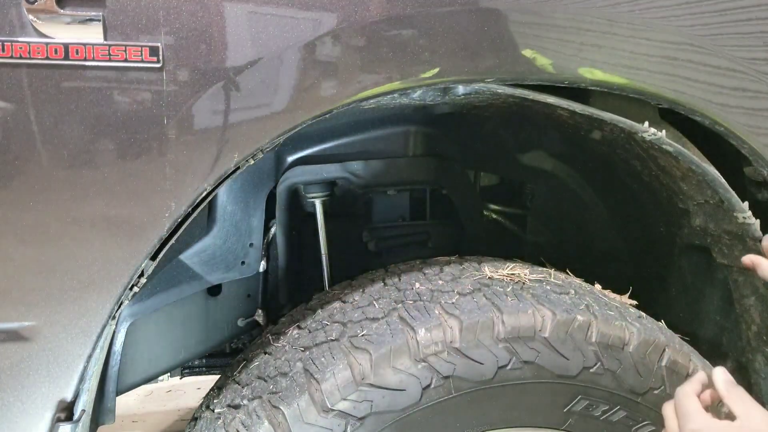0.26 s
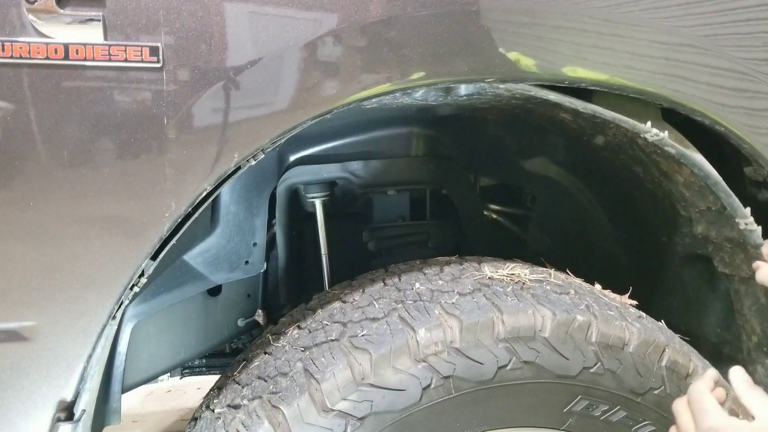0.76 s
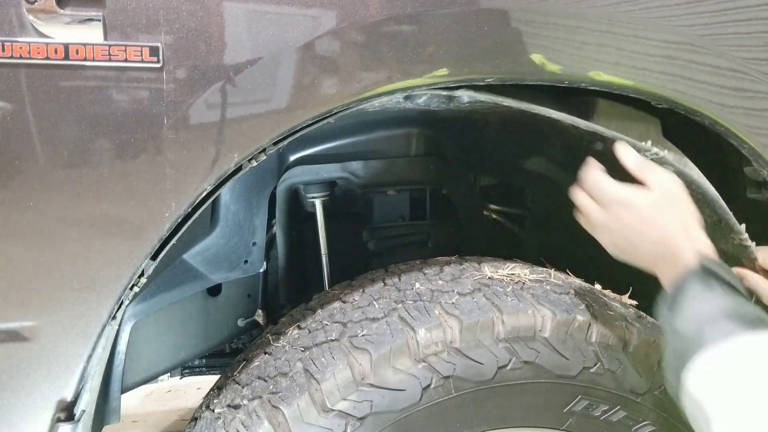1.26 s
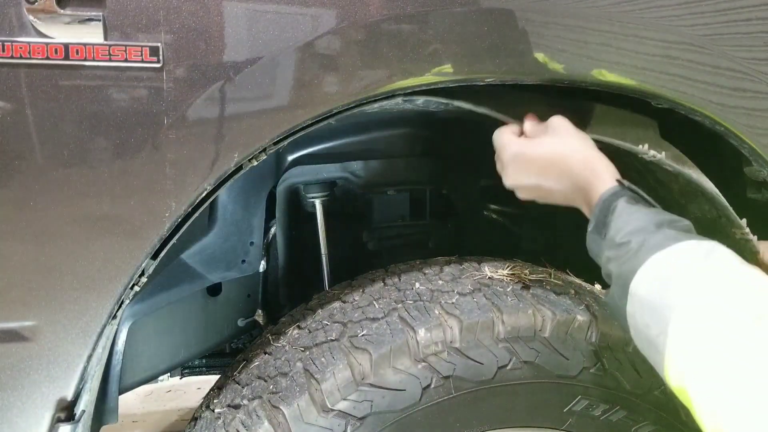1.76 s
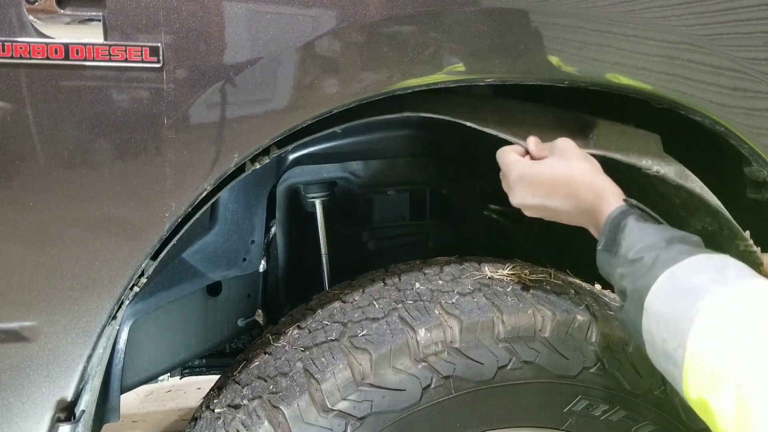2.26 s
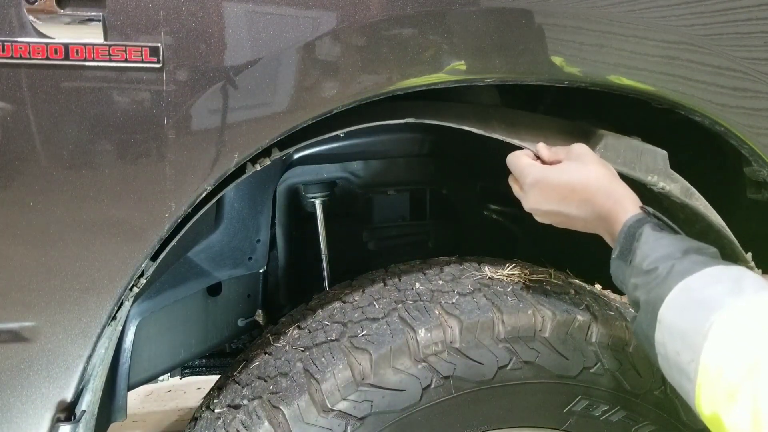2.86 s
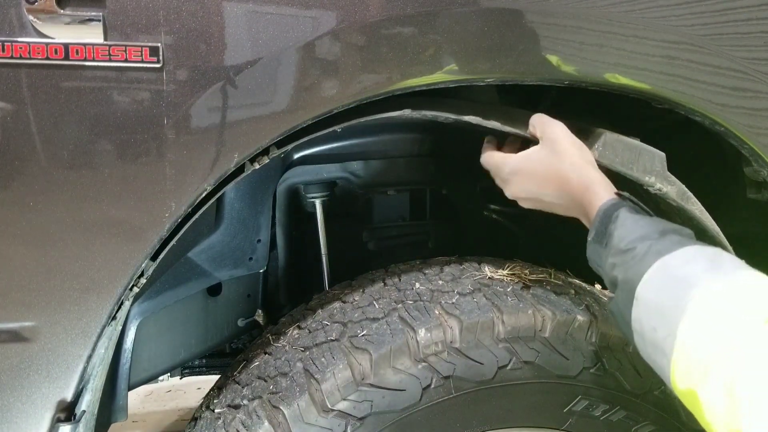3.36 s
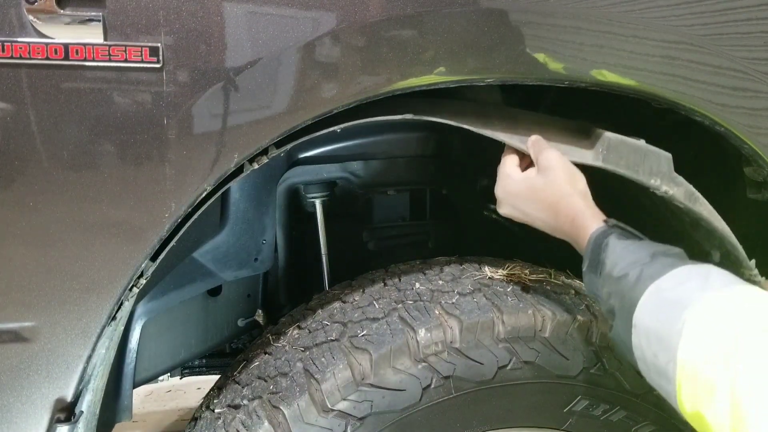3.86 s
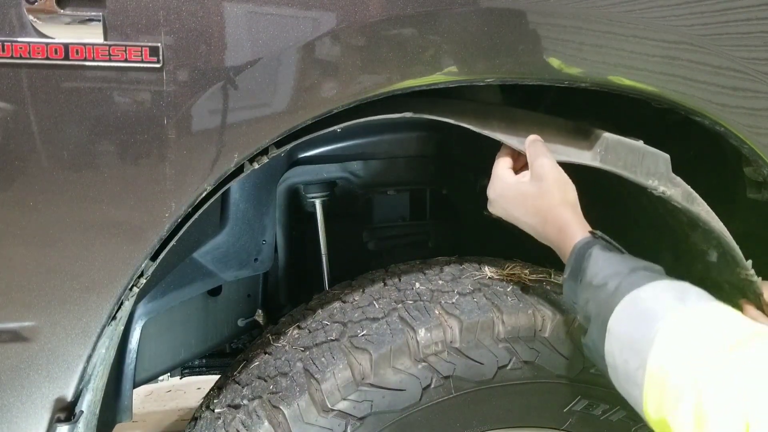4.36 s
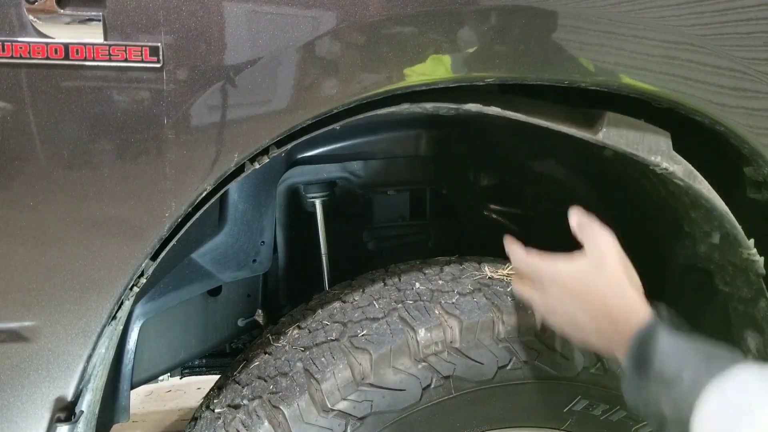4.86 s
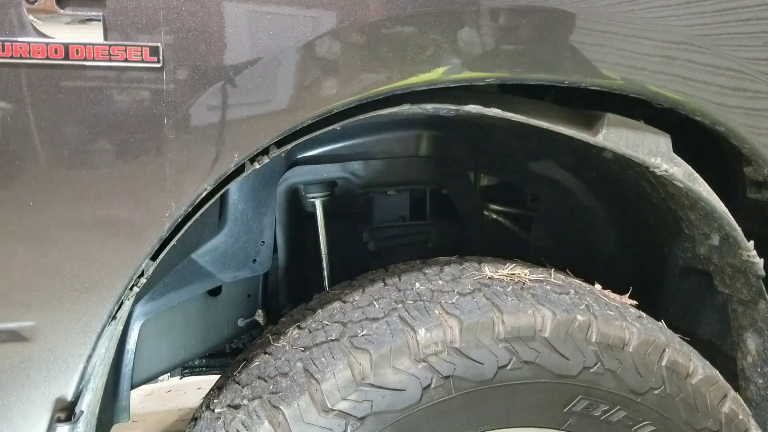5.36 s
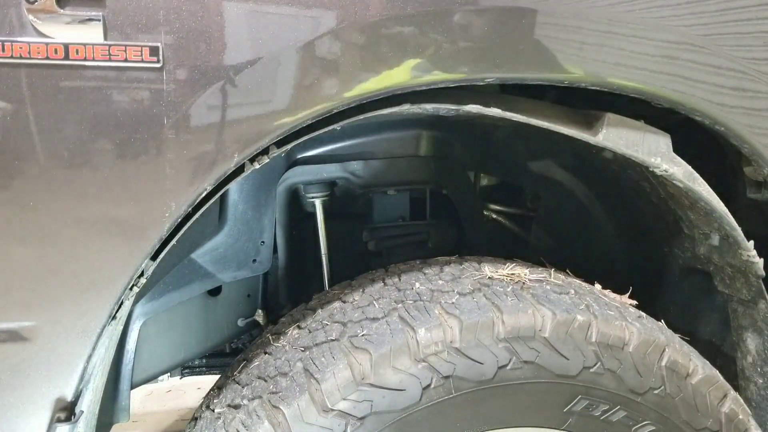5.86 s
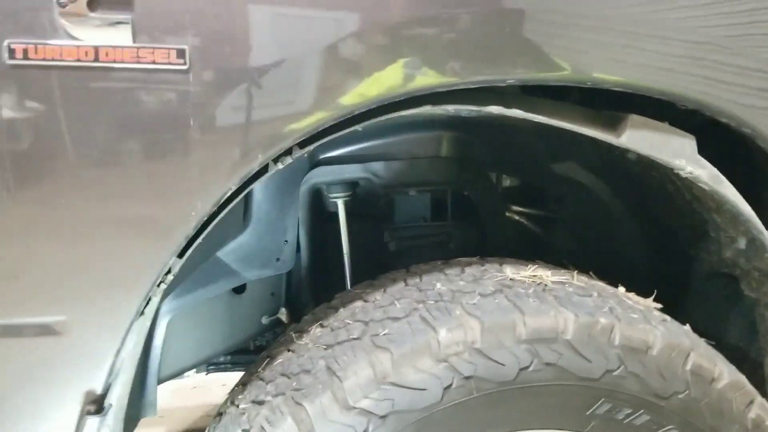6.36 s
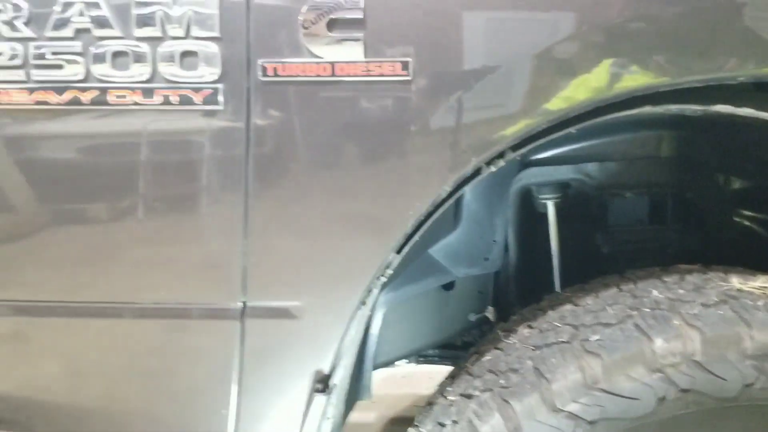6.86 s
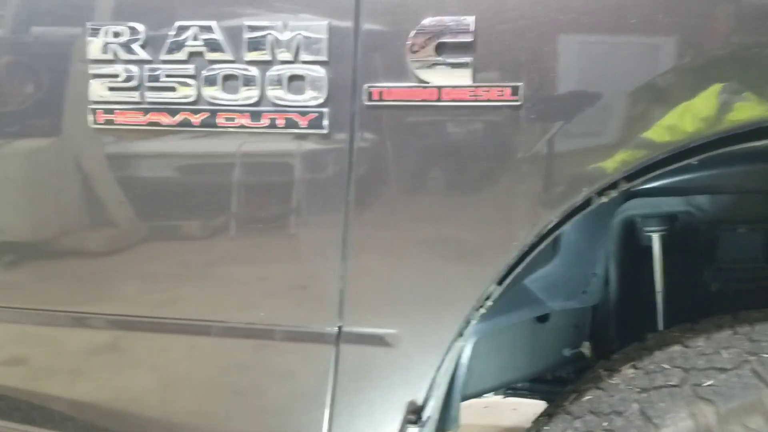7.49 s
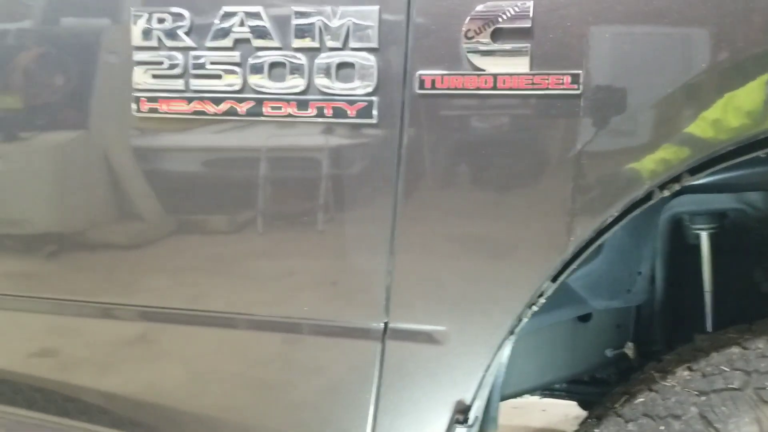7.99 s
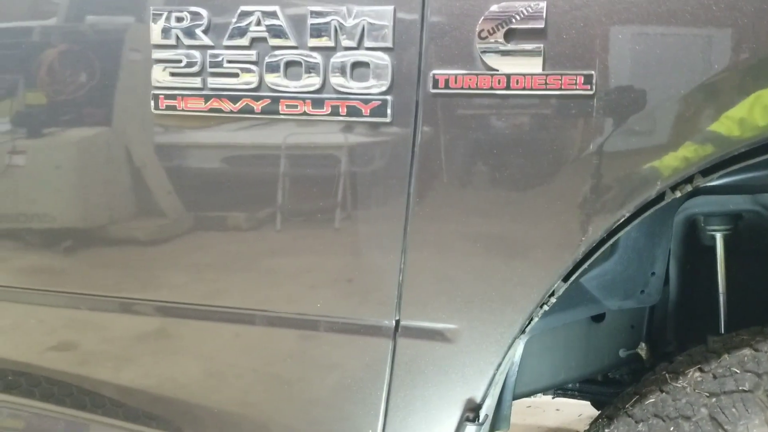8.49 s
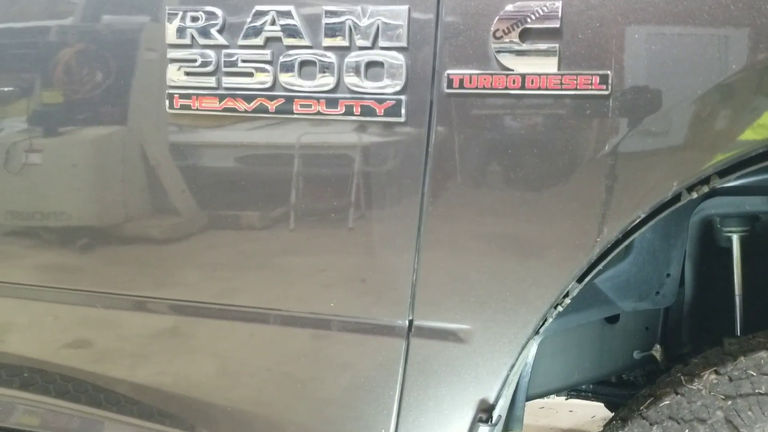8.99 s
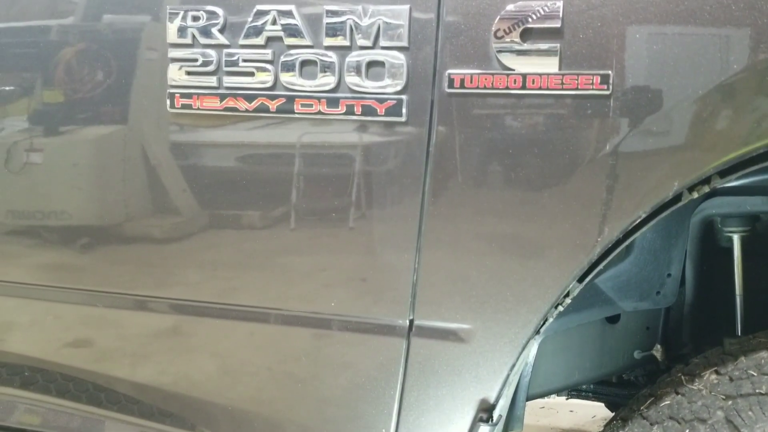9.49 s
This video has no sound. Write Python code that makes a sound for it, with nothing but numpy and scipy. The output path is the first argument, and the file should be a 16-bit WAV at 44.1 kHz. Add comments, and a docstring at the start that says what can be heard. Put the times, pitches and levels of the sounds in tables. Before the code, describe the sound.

A close, handheld stereo phone pickup in a workshop with short echo, low air rumble and barely audible machine hum. After near quiet, a tiny metal clink and jacket rustle at 0.3 s lead to a tight flurry of hollow plastic knocks from 0.4 to 1.1 s, strongest around 0.8, with dry scraping and juddering. Softer double knocks come at 1.7 and 2.0, then light bumps and ticks until 3.2. A short creak at 3.5 runs into a hard, bright clack at 3.57; smaller knocks, straining and faint squeaks continue to 4.9. Cloth swishes at 5.1; sharp case clicks and finger crackle come at 5.6. Dull steps with gritty crunch follow from 6.1 to 8.0, firmest around 7.15 with a faint metal ring. After a lull, rustling, steps and dull scuffs return from 8.8, with a sharp tick near 9.4.

```python
"""Wheel-well liner pulled about by hand

A plastic wheel-well liner knocks against the wing as rings of the sheet, a denser clack and a crack of noise.
It judders, creaks and scrapes in stick-and-slip grains amid dull mid-range bursts; a work jacket swishes finely.
Fingers crackle on a phone's case, and steps thud, tap and crunch on a gritty floor among small metal clinks.
A short hall echo of decaying noise follows the blows and steps; air rumble and a faint machine hum lie below."""
import sys
import numpy as np
from scipy import signal
from scipy.fft import rfft, irfft
from scipy.io import wavfile
from scipy.ndimage import uniform_filter1d

SR = 44100
rng = np.random.default_rng(int(sys.argv[2]) if len(sys.argv) > 2 else 0)


def materialize(psi):
    """Save the field psi as 16-bit PCM at rate SR to the path in sys.argv[1].

    A 1-D psi becomes a single channel; in a 2-D psi each row is a channel.
    """
    bounded = np.clip(np.atleast_2d(psi).T, -1, 1)
    quanta = np.round(bounded * 32767).astype(np.int16)
    wavfile.write(sys.argv[1], SR, quanta)


N = 429093
TIME = np.arange(N) / SR  # seconds
RING = TIME[:SR // 2]  # half a second, the span of every single blow
TOP_HZ = 16000  # nothing is heard above this
STROKE_DB = 20  # a sliding movement's rise and fall times span this many dB if its roundness is 1
SKEW_HZ = 219  # well below this the left port runs ahead of the right in phase
# a dull noise burst rises quickly, sags slightly, then falls
BURST_RISE_DB_PER_S, BURST_SAG_DB_PER_S, BURST_FALL_DB_PER_S = 398, 32, 156.5

# All levels in the tables are relative: each layer trims its own.
# Blows of the liner. Each row: start in seconds, boom of the sheet in dB, clack in dB, crack in dB,
# share of the free ring time left by the hand from 0 to 1.
LINER_KNOCKS = [(0.432, -30.5, -19.5, -46, 0.05), (0.451, -21.5, -47, -59, 0.12),
                (0.706, -33.5, -44.5, -65, 0.08), (0.763, -20, -24, -38.5, .22),
                (0.803, -15, -33.5, -31.5, 0.28), (0.853, -41, -50, -35.5, 0.3),
                (0.897, -20, -23, -39, 0.3), (0.928, -22, -46, -39, 0.27), (0.956, -23.5, -54, -44, 0.26),
                (1.034, -30.5, -38, -46, 0.9), (1.121, -45, -50, -41, 0.4), (1.279, -54, -44, -43.5, 0),
                (1.668, -26.5, -37.5, -40, 0.18), (1.691, -26.5, -31, -44.5, 0.43),
                (1.889, -35, -36.5, -83, 0.23), (1.974, -24.5, -44.5, -52, .16),
                (1.995, -30.5, -44, -44, 0.4), (2.101, -39, -44.5, -74, 0.28),
                (2.231, -60, -45, -57.5, 0.25), (2.313, -45.5, -51.5, -75, .25),
                (2.357, -48.5, -43, -48, 0.6), (2.568, -44, -39, -46, 0.2), (2.661, -54, -43, -65, .3),
                (2.679, -37.5, -55, -64, 0.17), (2.693, -48, -42, -50.5, .47), (2.804, -43, -43, -44, 0.55),
                (3.149, -39, -37.5, -44.5, 0.01), (3.35, -43.5, -55, -49, 0.62), (3.5552, -29, -21, -40, 0),
                (3.5655, -16.5, -17, -18, 0.48), (3.57, -27, -12, -30, 0.03),
                (3.691, -30.5, -38, -47, 0.35), (3.849, -42, -43.5, -40.5, 0.2), (3.875, -36, -47, -35, .6),
                (3.917, -33.5, -48, -36.5, .33), (3.963, -57.5, -33.5, -41.5, 0.1),
                (4.207, -33, -46, -40, 0.54), (4.237, -33, -53, -67, 0.16),
                (4.332, -44.5, -43.5, -56, 0.47), (4.662, -41.5, -39, -42.5, 0.8),
                (4.689, -39, -38.5, -45, 0.08), (4.797, -67, -30, -36.5, 0.16),
                (4.868, -63, -32, -40.5, 0.09)]
# Modes of the plastic sheet. Each row: frequency in Hz, level in dB, free decay t60 in seconds.
LINER_MODES = [(115.5, -19.5, 0.93), (218.4, -17.5, 0.23), (307, -3.5, 0.17), (439.6, 6, 0.12),
               (450.8, -6, 0.44), (490, -28.5, 0.5), (646, -27.5, 0.17), (770, -30, 0.88),
               (861, -6.5, 0.096), (904, 1, 0.088), (950, -25, 0.59), (1020, -15.5, 0.95),
               (1140, -24.5, 0.38), (1520, -26.5, 0.51)]
# Straining of the bent sheet. Each row: strongest moment in seconds, level in dB, rise and fall in seconds.
LINER_JUDDERS = [(0.47, -34.5, 0.12, .3), (1.01, -37.5, 0.15, .29), (2.05, -52.5, 0.63, 0.12),
                 (2.38, -46.5, 0.23, 0.16), (2.82, -56, 0.68, 0.9), (3.62, -38.5, 0.087, .3),
                 (3.91, -46, 0.28, .23), (4.28, -43, .15, 0.53), (4.72, -49.5, 0.62, 0.39)]
# Plastic creaks against the wing. Each row: start in seconds, length in seconds, pitch in Hz, level in dB.
LINER_CREAKS = [(3.474, 0.092, 760, -47.5), (4.396, 0.055, 1870, -48), (4.454, 0.045, 1930, -65)]
# Bursts of dull mid-range noise, 350 to 1300 Hz. Each row: start in seconds, length in seconds, level in dB.
DULL_NOISE_BURSTS = [(0.305, .04, -45), (0.44, .07, -41.5), (0.77, 0.071, -31.5), (0.9, .05, -34.5),
                     (1.29, .11, -41), (1.675, .045, -41), (1.98, .075, -38.5), (2.365, .075, -44.5),
                     (2.575, .025, -51.5), (2.8, .13, -44), (3.15, .14, -43.5), (3.57, .06, -35.5),
                     (3.87, .12, -41), (4.58, .2, -47), (4.8, .085, -37.5), (5.23, .13, -48),
                     (5.47, 0.094, -49), (5.564, 0.12, -41), (5.75, .16, -51.5), (5.93, .12, -49.5),
                     (6.1, .19, -54), (8.775, .06, -47.5), (9.26, .12, -40), (9.362, .13, -38.5),
                     (9.523, .21, -47.5)]
# Dry scrapes. Each row: fastest moment in seconds, level in dB, rise and fall in seconds.
DRY_SCRAPES = [(0.535, -34.5, 0.031, .18), (0.62, -37, 0.19, 0.16), (3.91, -50.5, .08, .05),
               (9.37, -46.5, 0.15, 0.43)]
# Movements that swish the jacket. Each row: fastest moment in seconds, level in dB, rise and fall in seconds.
JACKET_SWISHES = [(0.32, -39.5, 0.035, 0.093), (0.54, -36.5, 0.16, 0.19), (0.8, -51.5, .1, 0.16),
                  (1.2, -44, 0.42, 0.35), (1.7, -57.5, 0.22, .25), (2.01, -54, 0.17, 0.12),
                  (2.53, -50, .19, 0.22), (2.83, -61, 0.12, 0.16), (3.12, -61, 0.27, 0.61),
                  (3.37, -51, 0.062, 0.057), (3.59, -54.5, 0.11, .4), (4.31, -55.5, 0.27, 0.37),
                  (4.72, -46.5, 0.33, 1), (5.14, -40, 0.4, 0.41), (5.61, -48.5, 0.21, 0.16),
                  (6.0, -66.5, .4, .4), (6.49, -65, 0.092, 0.29), (6.72, -70, 0.092, 0.22),
                  (7.3, -74.5, 0.55, 0.54), (7.64, -57.5, .05, 0.076), (8.81, -45.5, 0.1, 0.18),
                  (9.06, -42, 0.28, 0.23), (9.4, -47, 0.49, 0.21), (9.72, -45, 0.24, .2)]
# Faint stirring of the cloth between swishes. Each row: time in seconds, level in dB.
CLOTH_STIR = [(0, -61.5), (2.1, -68.5), (2.9, -65), (6.0, -67), (6.5, -78.5), (8.6, -79.5), (9.73, -72.5)]
# Fingers shifting on the case. Each row: fastest moment in seconds, level in dB, rise and fall in seconds.
FINGER_SHIFTS = [(5.6, -47, .2, 0.23), (5.99, -54.5, .3, .45)]
# Clicks of the case under the fingers. Each row: start in seconds, peak level in dB.
CASE_CLICK_TIMES = [(5.5794, -18.5), (5.604, -19.5), (5.9721, -36), (6.1185, -37), (6.1375, -37)]
# Steps and bumps. Each row: start in seconds, time for the weight to come down in seconds,
# thud in dB, tap in dB, grit in dB.
FOOTSTEPS = [(6.091, .003, -38.5, -54, -48), (6.27, 0.037, -42.5, -56.5, -52),
             (6.455, 0.034, -30.5, -45, -40.5), (6.702, 0.024, -38.5, -44, -44),
             (6.757, 0.014, -50, -54.5, -49.5), (7.150, 0.006, -30, -41.5, -29),
             (7.613, 0.0057, -29.5, -42, -32.5), (7.854, 0.0072, -32.5, -52, -65),
             (7.982, 0.019, -35.5, -49, -67.5), (8.764, 0.0073, -65, -48.5, -39),
             (8.915, 0.0026, -40.5, -52.5, -33.5), (9.329, 0.019, -35.5, -46.5, -52),
             (9.452, 0.011, -37, -34.5, -44), (9.661, 0.0027, -70, -52, -37)]
# Touches of small metal parts. Each row: start in seconds, level in dB, index of the part.
METAL_CLINKS = [(0.308, -34.5, 0), (0.313, -42, 0), (7.155, -46.5, 1)]
# Modes of the metal parts, one list a part. Each row: frequency in Hz, level in dB, decay t60 in seconds.
METAL_MODES = [
    [(5770, -21, 0.24), (7300, -3, 0.31), (12100, -2, 0.11), (13260, -7, 0.13)],
    [(3620, -10, 0.44), (3704, -7, 0.28), (4382, -1, 0.39), (4900, 1.5, 0.41), (5400, -5, 0.55),
     (5470, -5, 0.5), (5550, -8, 0.37), (6385, -20, 0.28), (6700, -20, 0.2), (6800, -12.5, 0.26),
     (7200, -14, 0.4), (7470, -13.5, 0.13)],
]
# Sharp ticks of grit and stiff cloth. Each row: start in seconds, peak level in dB.
GRIT_CLOTH_TICKS = [(1.1214, -41), (1.992, -32), (2.3717, -33), (2.745, -39.5), (2.8155, -36),
                    (3.1492, -31.5), (3.9609, -33), (4.663, -30), (4.802, -23), (4.8443, -27.5),
                    (7.13, -42), (9.435, -24)]
# A fine, very high crackle during the steps. Each row: time in seconds, level in dB.
CRACKLE_LEVEL = [(5.9, -66), (6.4, -60.5), (7.4, -65.5), (8.0, -71), (8.3, -86)]
# Machine hum partials. Each row: frequency in Hz, level in dB about which it wavers.
MACHINE_HUM = [(91.5, -79), (129.2, -72.5), (360.7, -76), (479.1, -82.5), (602.9, -89)]

# Spectral colours follow. Each row: frequency in Hz, gain in dB.
# Deep body of the sheet, for knocks and judders; rows as above: Hz, dB.
BOOM_COLOUR = [(40, -16), (80, -4), (130, -8), (210, 0), (300, -0.5), (380, -15.5), (600, -35),
               (1500, -78.5)]
# Dense middle modes of the sheet; rows: Hz, dB.
CLACK_COLOUR = [(150, -51.5), (330, -2.5), (480, 5.5), (850, 1.5), (1300, -4), (1800, -19), (4000, -32)]
# Bright contact of liner and wing; rows: Hz, dB.
CRACK_COLOUR = [(400, -40.5), (1200, -4.5), (1900, 2.5), (2300, 4), (2700, -0.5), (3500, -1), (6000, -2),
                (10000, -8.5), (16000, -7)]
# An open sheet radiates little deep bass.
SHEET_COLOUR = [(20, -25.5), (45, -16), (80, -13.5), (130, -4.5), (200, -4.0), (290, -2), (16000, -2.5)]
# Hollow mid-range noise; rows: Hz, dB.
DULL_NOISE_COLOUR = [(120, -56), (280, -11), (380, 5), (560, -0.5), (780, -7), (945, -4), (1100, -8.5),
                     (1270, -7.5), (1550, -12), (2100, -18.5), (5000, -59)]
# Dry scrape of the plastic; rows: Hz, dB.
SCRAPE_COLOUR = [(200, -56), (600, -7), (1200, -12.5), (1550, 4), (1850, 0), (2280, 3), (3000, -2.5),
                 (4500, -5), (6300, -0.5), (9000, -4), (16000, -20.5)]
# Stiff jacket cloth; rows: Hz, dB.
CLOTH_COLOUR = [(150, -35), (400, -5), (1200, -12), (2300, -7.5), (4000, -6), (6000, -4), (10000, -2.5),
                (14000, 3), (16000, -3)]
# Snapping creases and sharp ticks; rows: Hz, dB.
SNAP_COLOUR = [(500, -42.5), (2000, -20.5), (5000, -14), (9000, 2), (13000, 10), (16000, -6.5)]
# Phone case under the fingers; rows: Hz, dB.
CASE_COLOUR = [(300, -30), (1000, -8), (1750, -8), (2600, -8), (3600, -16), (5200, -10.5), (6550, 6.5),
               (7600, -8), (10500, 7), (16000, -5.5)]
# Sole on the floor: the soft thud, then the firmer tap.
THUD_COLOUR = [(30, -26.5), (70, -7.5), (170, -5.0), (280, -8.5), (450, -16.5), (1200, -71)]
TAP_COLOUR = [(150, -18.5), (380, 0), (540, 13.0), (750, -1.5), (1100, -23.5), (3000, -24)]
# Crunch of grit and rattle of metal; rows: Hz, dB.
GRIT_COLOUR = [(500, 12), (1500, -8), (2700, -9), (4000, -2.5), (5500, 2.5), (10000, 3.5), (16000, -4)]
# Thin fizz at the very top.
FIZZ_COLOUR = [(3000, -32), (5500, -10), (9000, -17), (12500, 3), (16000, 2.5)]
# Air of the workshop; rows: Hz, dB.
AIR_COLOUR = [(20, -8.5), (60, 9.5), (90, 4), (130, -3.5), (200, -5), (280, -14.5), (420, -19.5),
              (700, -27), (1200, -30), (3000, -36.5), (6000, -34.5), (16000, -27.5)]
# Echo of the hall, in its shared bass and its separate treble.
HALL_BASS = [(50, 6.0), (300, -5.0), (700, -8), (2000, -25.5)]
HALL_TREBLE = [(200, -21), (700, -5), (2500, -1), (6000, -4.0), (14000, -21.5)]
# Response of the microphone ports; rows: Hz, dB.
PORT_COLOUR = [(20, -2.5), (5000, 1), (6500, 1.5), (8400, -13), (10500, -5), (13000, 0.5), (16000, -3)]


def knocks():
    """Each blow rings the sheet's low modes, a clack of dense higher ones and a crack at the contact."""
    out = np.zeros((2, N))
    low_modes = [mode for mode in LINER_MODES if mode[0] < 370]
    high_modes = [mode for mode in LINER_MODES if mode[0] >= 370]
    for s, boom_db, clack_db, crack_db, free in LINER_KNOCKS:
        boom_tone = ring(low_modes, free, detune=0.015, scatter_db=2)
        boom_noise = colour(ports(len(RING), 1.0) * fade(0.35 * free), BOOM_COLOUR)
        boom = (peak(boom_tone, 0) + peak(boom_noise, 0)) * press(0.0025, 20)

        clack_tone = ring(high_modes, 1.2 * free, detune=0.012, scatter_db=3)
        clack_noise = colour(ports(len(RING), 0.76) * fade(0.25 * free), CLACK_COLOUR)
        clack = peak(clack_tone, -6.4) + peak(clack_noise, 0.55)

        # the crack is over at once, then the edge buzzes briefly
        crack_shape = press(0.0015, 0.015) + undb(-6.5) * press(0.0039, 0.18)
        # a blunt blow, more clack than crack, loses its top
        top_db = np.clip(crack_db - clack_db + 10.5, -16, 0)
        blunted = [(hz, db + np.interp(hz, [2000, 6000], [0, top_db])) for hz, db in CRACK_COLOUR]
        crack = colour(ports(len(RING), 0.2) * crack_shape, blunted)

        add(out, s, peak(boom, boom_db + 0.5))
        add(out, s, peak(clack, clack_db + 0.5))
        add(out, s, peak(crack, crack_db + 0.5, size=130))
    return colour(wheel_well(out), SHEET_COLOUR)


def wheel_well(x, round_hz=118.77, keep=0.17, count=3):
    """The middle range bounces between liner and tyre, weaker and narrower in band on every round trip."""
    out, echo = x, x
    band = signal.butter(1, [330, 1800], "band", fs=SR, output="sos")
    for _ in range(count):
        echo = keep * signal.sosfiltfilt(band, echo)
        echo = np.pad(echo, ((0, 0), (int(SR / round_hz), 0)))[:, :N]
        out = out + echo
    return out


def judder():
    """The straining sheet slips in small jerks that ring its modes."""
    jerks = slips(rate=150, spread_db=3.5, likeness=1.0)
    sheet = ring(LINER_MODES, damping=0.25, detune=0.01, scatter_db=2)
    rung = unit(signal.oaconvolve(jerks, sheet[None], axes=1)[:, :N])
    bumps = unit(colour(jerks, BOOM_COLOUR))
    body = unit(colour(rung + 0.37 * bumps, BOOM_COLOUR))
    return body * strokes(LINER_JUDDERS, roundness=1.05) * undb(-1.5)


def creaks():
    """Stick and slip lock briefly into a rough, broken tone."""
    out = np.zeros((2, N))
    for s, length, hz, db in LINER_CREAKS:
        pitch_hz = hz * (1 + 0.05 * walk(700)[:len(RING)])
        roughness = undb(4 * walk(150)[:len(RING)])
        arch = np.sin(np.pi * np.clip(RING / length, 0, 1))
        tone = np.sin(2 * np.pi * np.cumsum(pitch_hz) / SR)
        add(out, s, undb(db) * arch * roughness * tone)
    return out


def dull_noise_and_scrape(bed_db=-61, bed_end_s=5.2):
    """Dense grains make hollow mid-range noise, with a faint bed fading out near 5.2 s; finer ones a dry scrape."""
    dull_grains = colour(grains(rate=2500, spread_db=2.5, likeness=0.65), DULL_NOISE_COLOUR)
    # short repeats make it hollow
    dull_noise = unit(wheel_well(dull_grains, keep=0.5))
    bed = undb(bed_db) * np.clip((bed_end_s - TIME) * 10, 0, 1)
    dull_gain = np.hypot(burst_gain(), bed) * undb(-3 + 1.6 * walk(35))

    scrape = unit(colour(grains(rate=12000, spread_db=2, likeness=0.4), SCRAPE_COLOUR))
    scrape_gain = strokes(DRY_SCRAPES, roundness=0.71) * undb(5.0 + 1.1 * walk(70))
    return dull_noise * dull_gain + scrape * scrape_gain


def burst_gain():
    """Gain of the dull noise bursts: quick rise, slight sag, fall."""
    power = 0
    for s, length, db in DULL_NOISE_BURSTS:
        since = TIME - s
        rise = BURST_RISE_DB_PER_S * np.maximum(-since, 0)
        sag = BURST_SAG_DB_PER_S * np.maximum(since, 0)
        fall = BURST_FALL_DB_PER_S * np.maximum(since - length, 0)
        power = power + undb(db - np.minimum(rise + sag + fall, 100)) ** 2
    return np.sqrt(power)


def jacket(pan_db=-5, crease_db=-74):
    """Countless threads of stiff cloth flick over each other, a little to the right; creases crackle faintly."""
    threads = unit(colour(grains(rate=14000, spread_db=-4.0, likeness=0.072), CLOTH_COLOUR))
    creases = unit(colour(grains(rate=70, spread_db=4, likeness=0.5), SNAP_COLOUR))
    movement = np.hypot(strokes(JACKET_SWISHES, roundness=1.154), swell(CLOTH_STIR))
    swish = threads * movement * undb(5.0 + 1.1 * walk(60))
    return pan(swish + creases * undb(crease_db), pan_db)


def handling():
    """Fingers creep over the phone's case, which colours both their crackle and its own clicks."""
    creep = unit(colour(grains(rate=3900, spread_db=2.5, likeness=0.37), CASE_COLOUR))
    return creep * strokes(FINGER_SHIFTS, roundness=1.4) + ticks(CASE_CLICK_TIMES, CASE_COLOUR)


def steps(grit_pan_db=-5):
    """A soft thud and tap as the sole rolls down, with grit crunching on the concrete."""
    out = np.zeros((2, N))
    for s, roll, thud_db, tap_db, grit_db in FOOTSTEPS:
        thud = colour(ports(len(RING), 0.9) * press(roll, 0.1), THUD_COLOUR)
        tap = colour(ports(len(RING), 0.25) * press(roll, 0.041), TAP_COLOUR)
        crunch = press(roll, 0.063) + undb(-9.5) * press(roll, 0.6)
        grit = colour(ports(len(RING), 0.19) * crunch, GRIT_COLOUR)
        add(out, s, peak(thud, thud_db - 9.0))
        add(out, s, peak(tap, tap_db - 0.6))
        add(out, s, pan(peak(grit, grit_db - 10.5, size=130), grit_pan_db))
    return out


def clinks():
    """Small metal parts touch with a brief rattle and ring on in clusters of close modes."""
    out = np.zeros((2, N))
    for s, db, part in METAL_CLINKS:
        # three slightly detuned copies of each mode, drawn afresh for each port
        cluster = METAL_MODES[part] * 3
        tone = np.array([ring(cluster, damping=0.9, detune=0.009, scatter_db=2) for _ in range(2)])
        rattle = colour(ports(len(RING), 0.27) * fade(0.14), GRIT_COLOUR)
        add(out, s, peak(tone, db) + peak(rattle, db - 3))
    return out


def ticks(table, spectrum):
    """Very short clicks of noise with a weak tail, in the given colour."""
    out = np.zeros((2, N))
    for s, db in table:
        shape = press(0.00018, 0.0082) + undb(-17) * fade(0.055)
        click = colour(ports(len(RING), 0.25) * shape, spectrum)
        add(out, s, click * undb(db + 2.5) / np.abs(click).max())
    return out


def crackle(rate=700, spread_db=4):
    """Tiny dry ticks at the very top, dense enough to run together into a thin fizz."""
    fizz = unit(colour(grains(rate, spread_db, likeness=0.25), FIZZ_COLOUR))
    return fizz * swell(CRACKLE_LEVEL)


def workshop():
    """Low air rumble as coloured noise, and the hum of a machine as sines wavering in level and phase."""
    air = unit(colour(ports(N, 0.75), AIR_COLOUR)) * undb(-63.5 + 0.55 * walk(2.5))
    hum = 0
    for hz, db in MACHINE_HUM:
        level = np.sqrt(2) * undb(db + 3.0 * walk(6.7))
        hum = hum + level * np.sin(2 * np.pi * hz * TIME + 0.5 * walk(27))
    return air + hum


def hall(x, t60, wet_db, build=0.0061):
    """Diffuse echo of the workshop as decaying noise; the bass arrives alike at both ports."""
    bass = colour(ports(len(RING), 1.0), HALL_BASS)
    treble = colour(ports(len(RING), 0.1), HALL_TREBLE)
    shape = fade(t60) * (1 - np.exp(-RING / build))
    echo = (bass + treble) * shape * undb(wet_db) / np.sqrt(np.sum(shape ** 2))
    return x + signal.oaconvolve(x, echo, axes=1)[:, :N]


def grains(rate, spread_db, likeness):
    """Tiny grains of noise at random moments, `rate` a second, of uneven size."""
    released = rng.random(N) < rate / SR
    size = np.minimum(rng.standard_exponential(N), 4)
    return unit(released * undb(spread_db * size) * ports(N, likeness))


def slips(rate, spread_db, likeness):
    """Stick and slip: each grain is a tiny release."""
    return grains(rate, spread_db, likeness)


def ring(modes, damping, detune, scatter_db):
    """Modes struck at a random place; bending shifts their pitch a little."""
    out = 0
    for hz, db, t60 in modes:
        place, bend = rng.standard_normal(2)
        tone = np.sin(2 * np.pi * hz * (1 + detune * bend) * RING)
        out = out + undb(db + scatter_db * place) * fade(t60 * damping) * tone
    return out


def strokes(table, roundness):
    """Gain of overlapping sliding movements, each rising to its peak and falling; 1 is a sharp peak."""
    power = 0
    for s, db, rise, fall in table:
        away = np.maximum((s - TIME) / rise, (TIME - s) / fall)
        near = away < 4
        gain = np.zeros(N)
        gain[near] = undb(db - STROKE_DB * away[near] ** roundness)
        power = power + gain ** 2
    return np.sqrt(power)


def press(roll, t60):
    """Builds up while the weight comes down, then decays."""
    build = np.minimum(RING / max(roll, 0.001), 1)
    return build * np.exp(-np.log(1000) * np.maximum(RING - roll, 0) / t60)


def fade(t60):
    """Exponential decay by 60 dB in t60 seconds, never shorter than 2 ms."""
    return np.exp(-np.log(1000) * RING / max(t60, 0.002))


def walk(rate):
    """Slow chance with a spread near 1, a new value `rate` times a second joined by straight lines."""
    knots = rng.standard_normal(2000)
    return np.interp(TIME * rate, np.arange(len(knots)), knots)


def ports(length, likeness):
    """Noise at the two microphone ports, partly shared: likeness 1 is the same at both."""
    shared = rng.standard_normal(length)
    separate = rng.standard_normal((2, length))
    return np.sqrt(likeness) * shared + np.sqrt(1 - likeness) * separate


def colour(x, points, size=2048):
    """Causal minimum-phase filter with the given (Hz, dB) response, by folding its cepstrum."""
    hz, db = np.transpose(points)
    grid = np.maximum(np.fft.rfftfreq(size, 1 / SR), 1)
    cepstrum = irfft(np.log(undb(np.interp(np.log(grid), np.log(hz), db))))
    cepstrum[1:size // 2] *= 2
    cepstrum[size // 2 + 1:] = 0
    response = irfft(np.exp(rfft(cepstrum)))
    return signal.oaconvolve(x, response[None], axes=1)[:, :x.shape[1]]


def undb(db):
    """Decibels to gain."""
    return 10 ** (np.asarray(db) / 20)


def unit(x):
    """Scale to rms 1."""
    return x / np.sqrt(np.mean(x ** 2))


def peak(x, db, size=300):
    """Scale a blow so that its loudest stretch of `size` samples has this rms level."""
    power = np.mean(np.atleast_2d(x) ** 2, axis=0)
    return x * undb(db) / np.sqrt(uniform_filter1d(power, size).max())


def swell(curve):
    """Gain over time from rows of seconds and dB; as good as silent outside them."""
    return undb(np.interp(TIME, *np.transpose(curve), left=-200, right=-200))


def add(track, s, sound):
    """Mix a sound in at time s."""
    start = int(s * SR)
    track[:, start:start + sound.shape[-1]] += sound[..., :N - start]


def pan(x, db):
    """Left louder than right by this many dB."""
    return x * undb(np.array([[db], [-db]]) / 2)


def lag(x, seconds):
    """The sound reaches the left port a moment after the right."""
    late_left = np.pad(x[0], (int(seconds * SR), 0))[:N]
    return np.array([late_left, x[1]])


def skew(x):
    """The two ports differ in the bass, where their phases part by up to a quarter cycle."""
    size = 2 ** 19
    turn = np.arctan2(SKEW_HZ, np.fft.rfftfreq(size, 1 / SR))
    return irfft(rfft(x, size) * np.exp(0.5j * np.array([turn, -turn])))[:, :N]


def scene():
    """Blows and steps echo through the hall; dull noise, scrapes, cloth, fingers and hum fill the gaps."""
    blows = hall(knocks(), t60=0.54, wet_db=-4.5)
    liner = blows + judder() + creaks() + pan(dull_noise_and_scrape(), db=-0.5)
    floor = hall(steps() + clinks() + ticks(GRIT_CLOTH_TICKS, SNAP_COLOUR), t60=0.34, wet_db=-4.5)
    worker = lag(liner, 0.00025) + lag(jacket(), 0.0004)
    return worker + pan(handling(), db=-0.5) + floor + crackle() + workshop()


def record(dry):
    """The phone's ports skew the bass and hollow out the upper treble, and the top is cut."""
    heard = skew(colour(dry, PORT_COLOUR))
    top_cut = signal.ellip(10, 0.2, 70, TOP_HZ, fs=SR, output="sos")
    return signal.sosfilt(top_cut, heard)


dry = scene()
out = record(dry)
materialize(out)
```